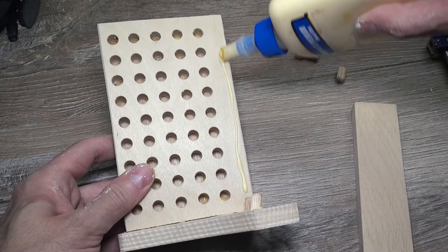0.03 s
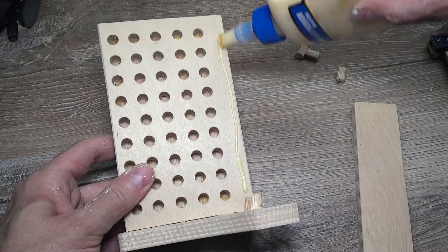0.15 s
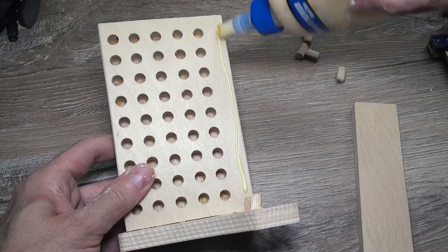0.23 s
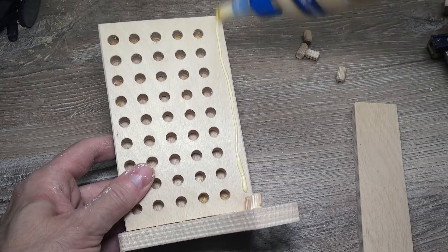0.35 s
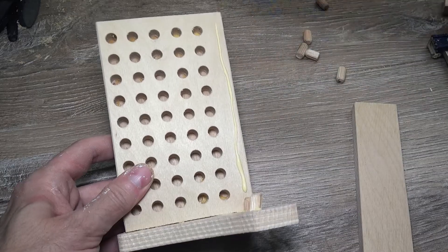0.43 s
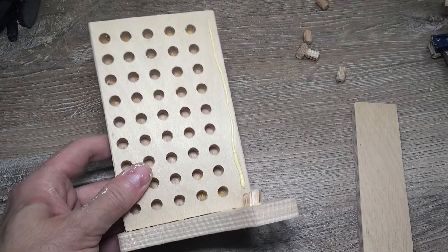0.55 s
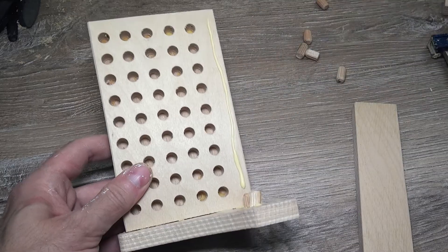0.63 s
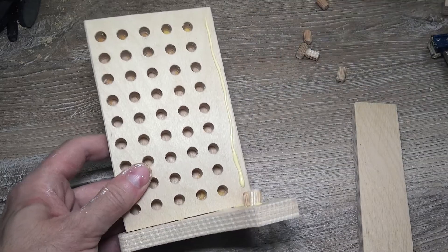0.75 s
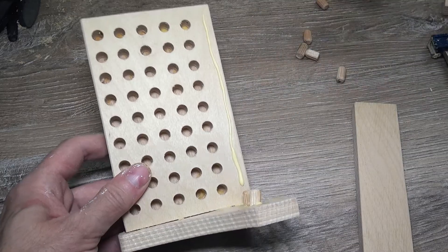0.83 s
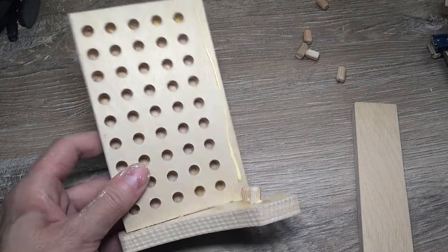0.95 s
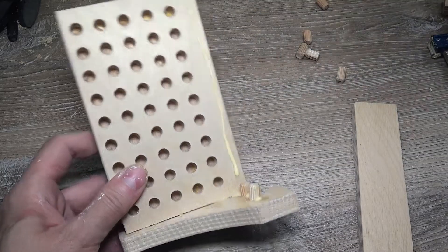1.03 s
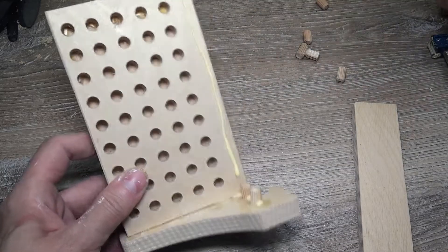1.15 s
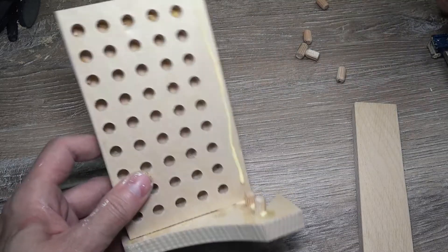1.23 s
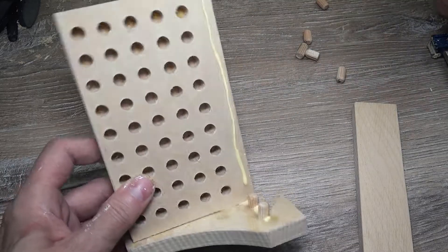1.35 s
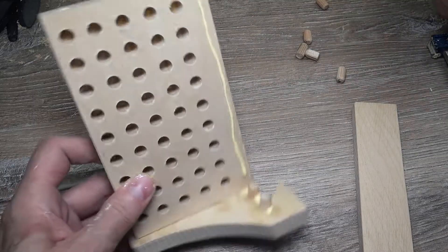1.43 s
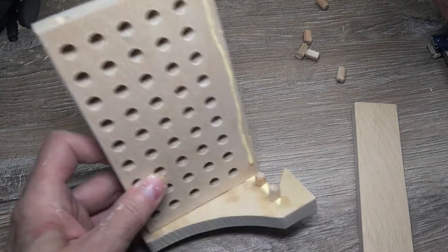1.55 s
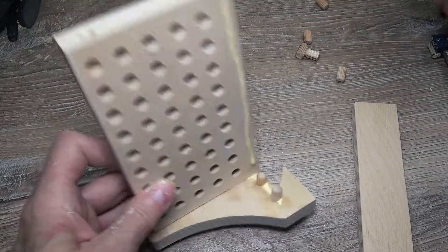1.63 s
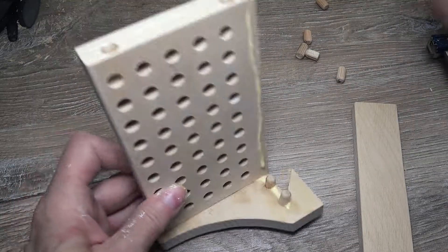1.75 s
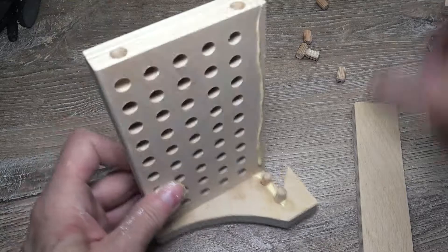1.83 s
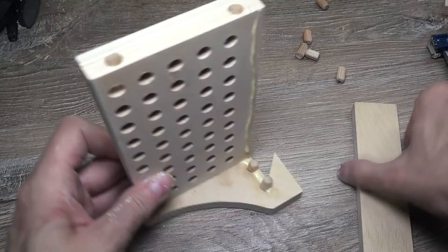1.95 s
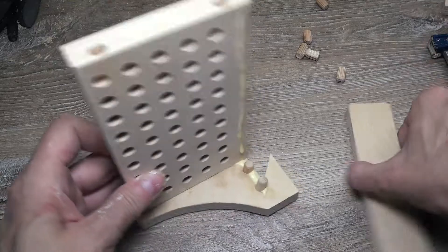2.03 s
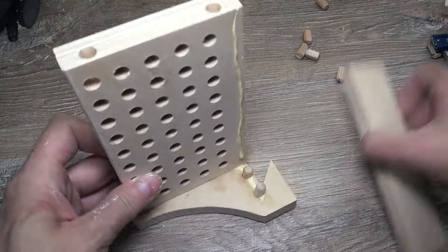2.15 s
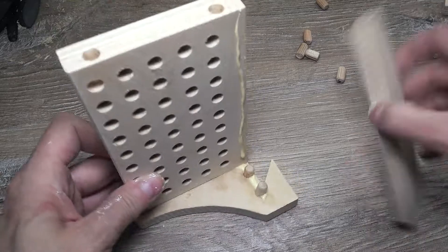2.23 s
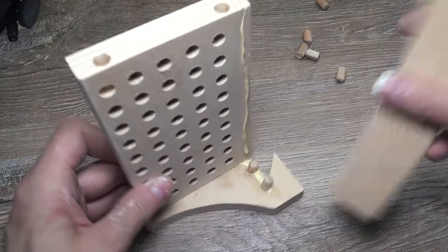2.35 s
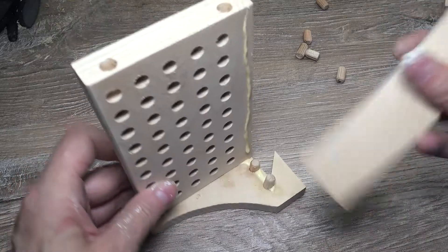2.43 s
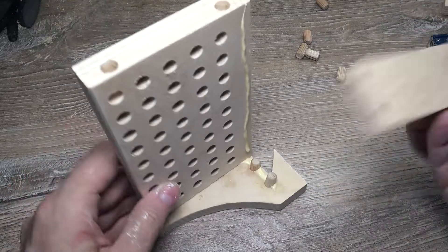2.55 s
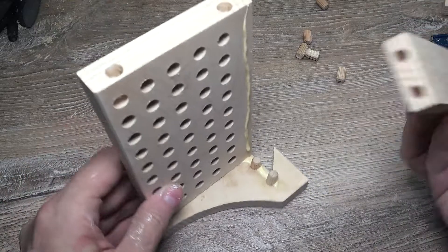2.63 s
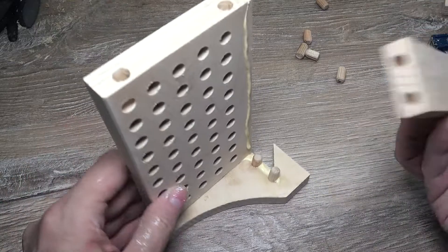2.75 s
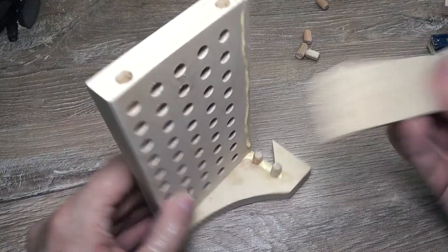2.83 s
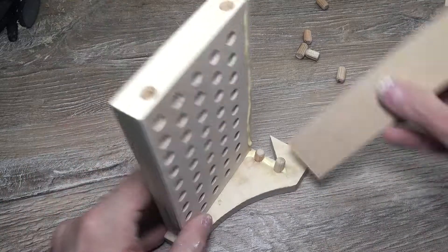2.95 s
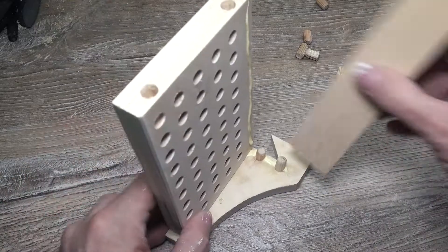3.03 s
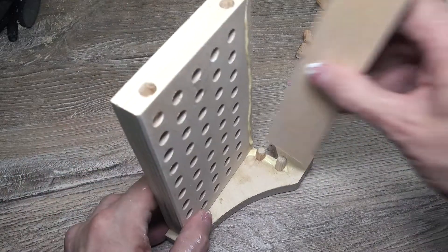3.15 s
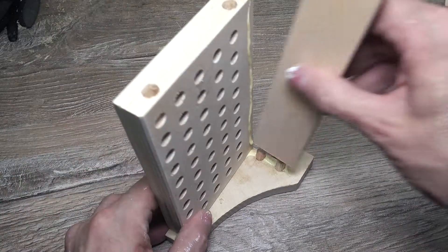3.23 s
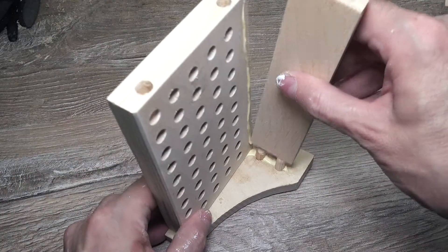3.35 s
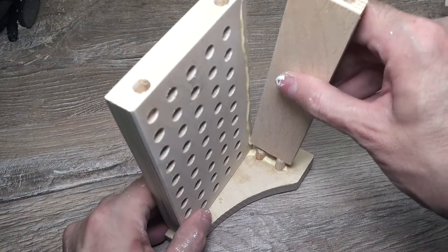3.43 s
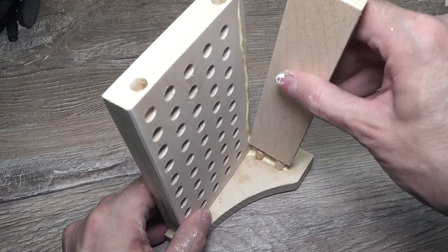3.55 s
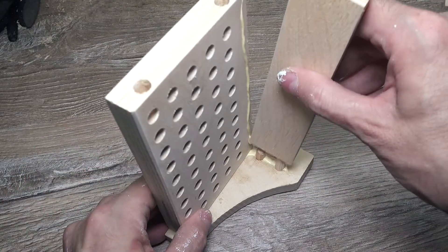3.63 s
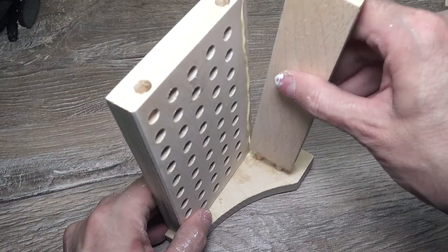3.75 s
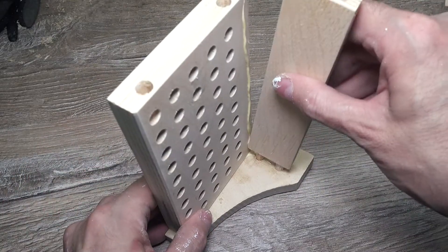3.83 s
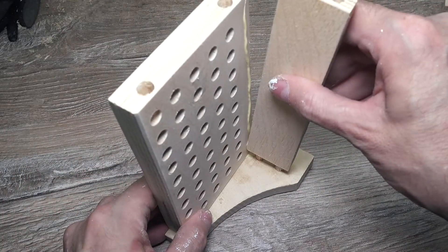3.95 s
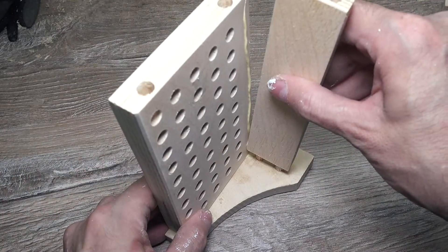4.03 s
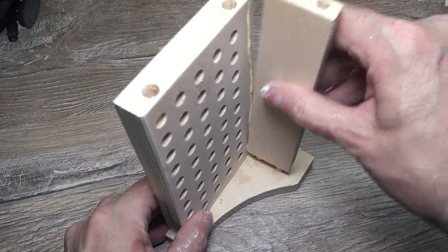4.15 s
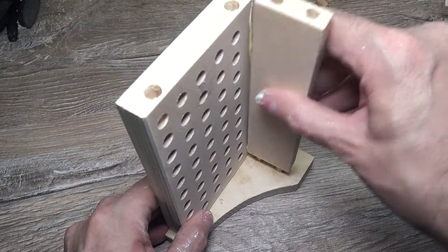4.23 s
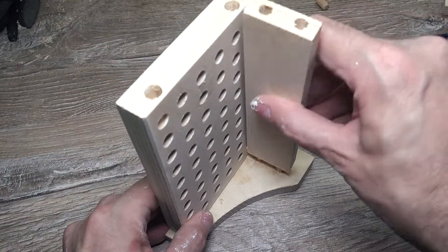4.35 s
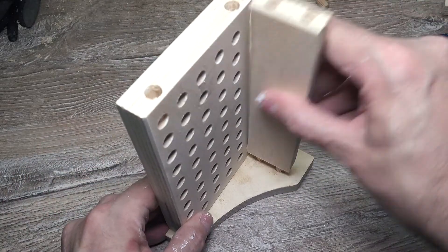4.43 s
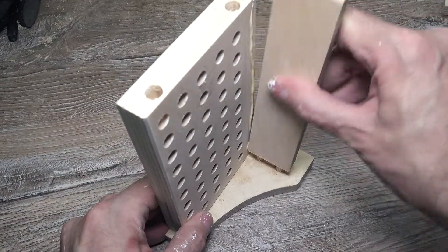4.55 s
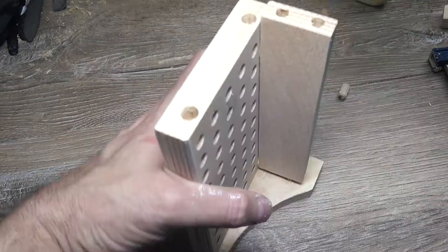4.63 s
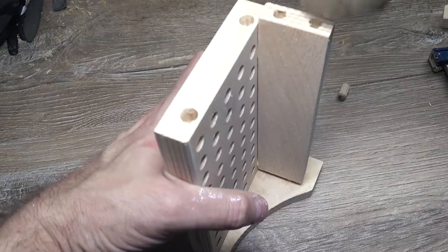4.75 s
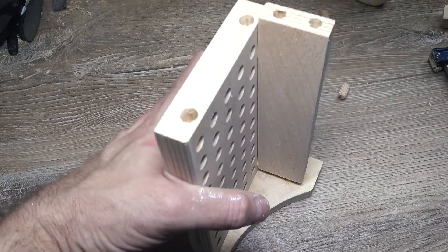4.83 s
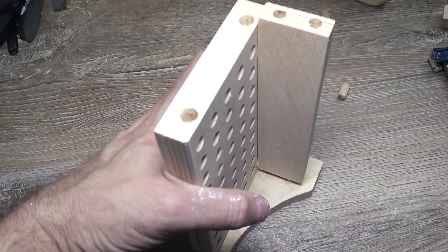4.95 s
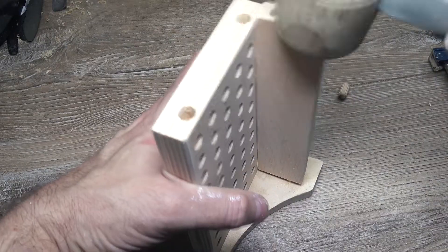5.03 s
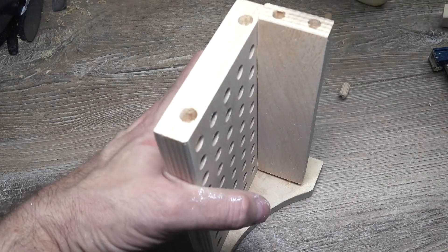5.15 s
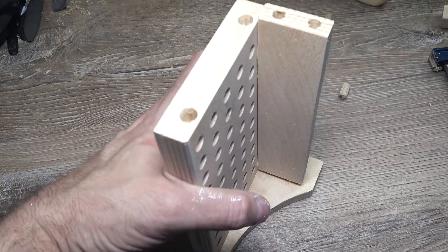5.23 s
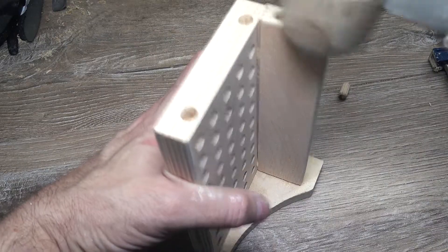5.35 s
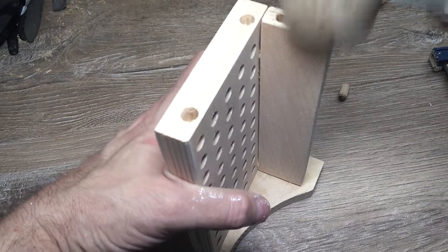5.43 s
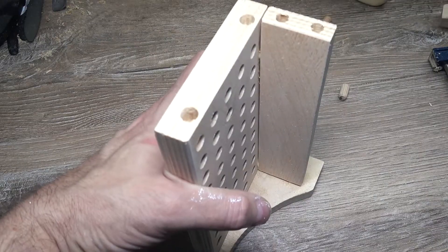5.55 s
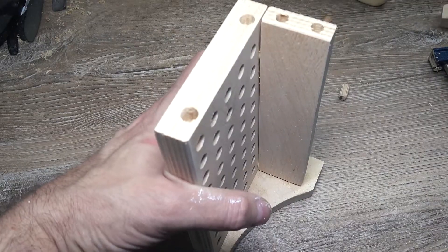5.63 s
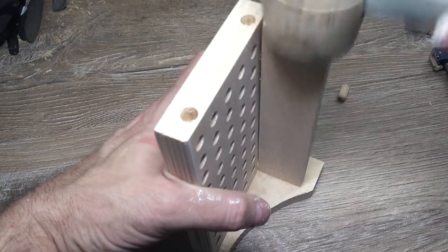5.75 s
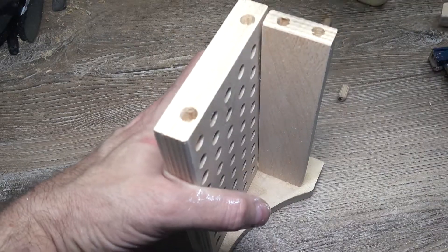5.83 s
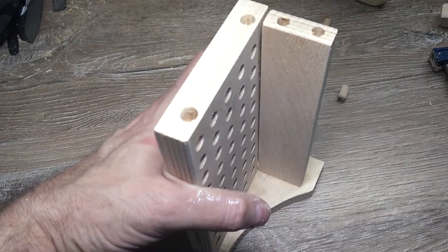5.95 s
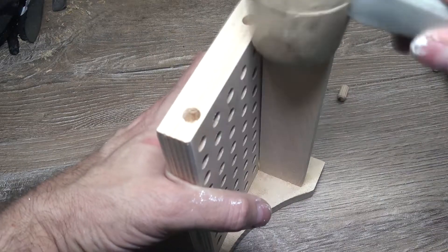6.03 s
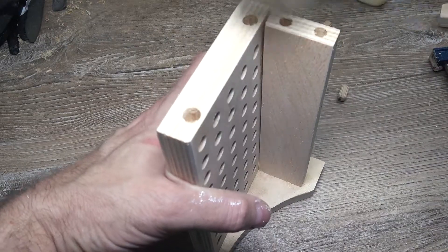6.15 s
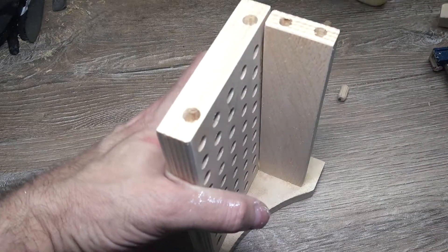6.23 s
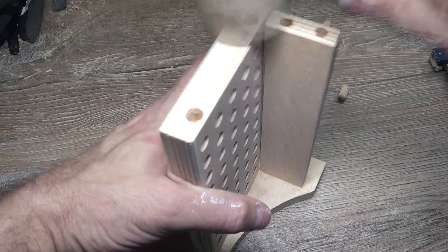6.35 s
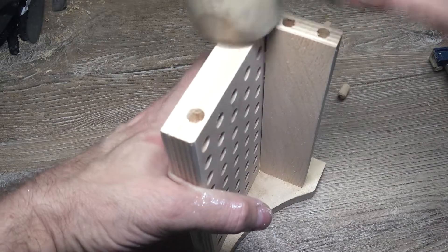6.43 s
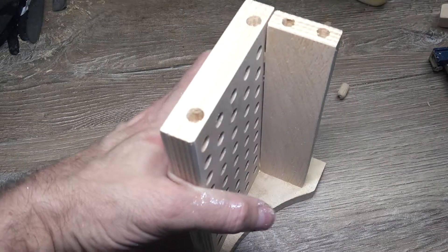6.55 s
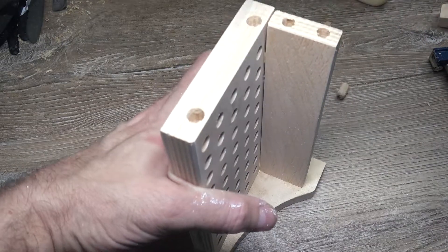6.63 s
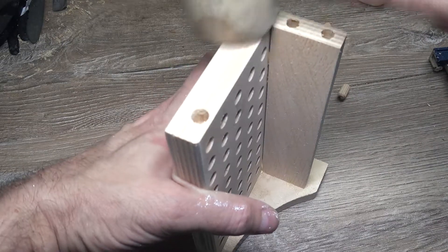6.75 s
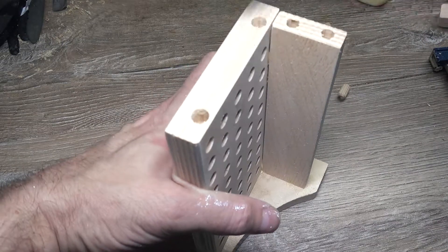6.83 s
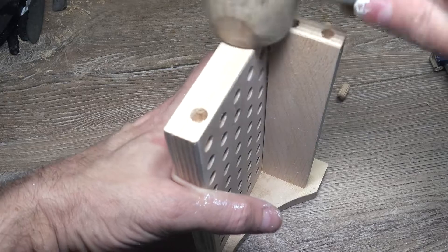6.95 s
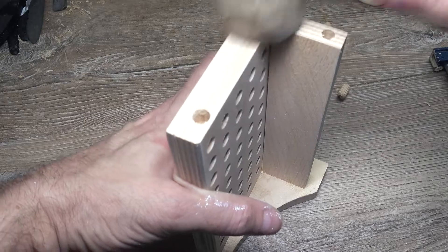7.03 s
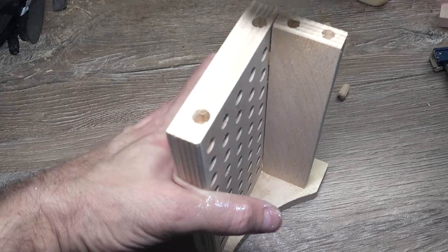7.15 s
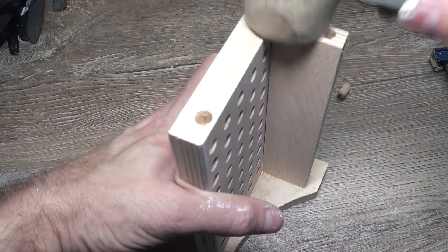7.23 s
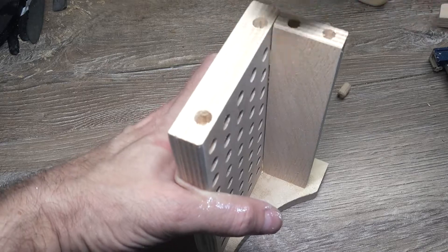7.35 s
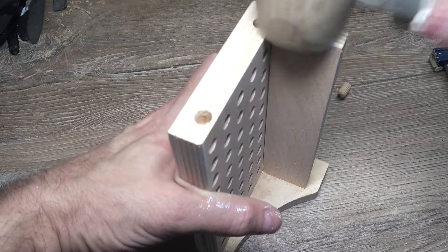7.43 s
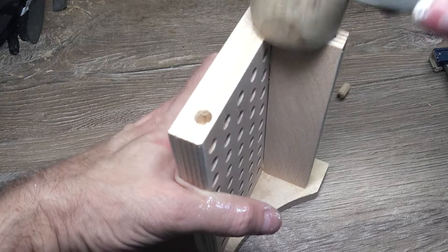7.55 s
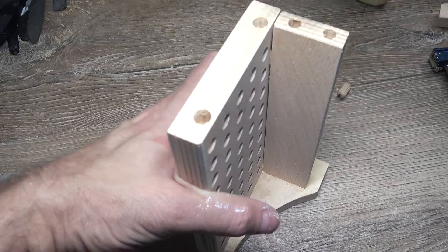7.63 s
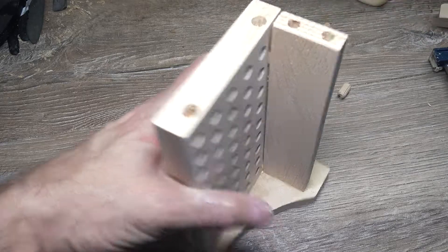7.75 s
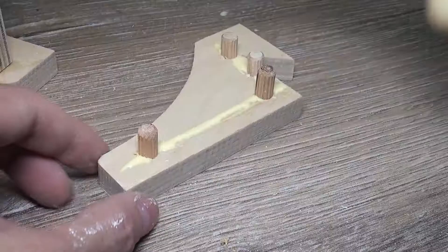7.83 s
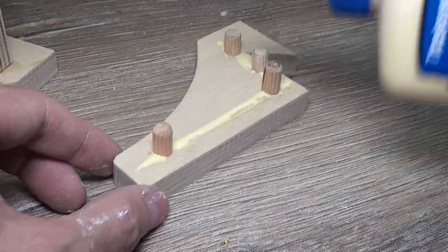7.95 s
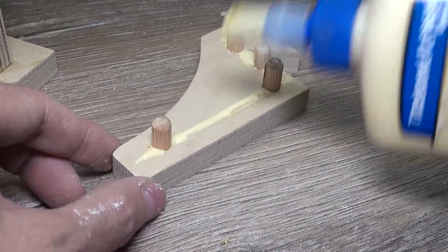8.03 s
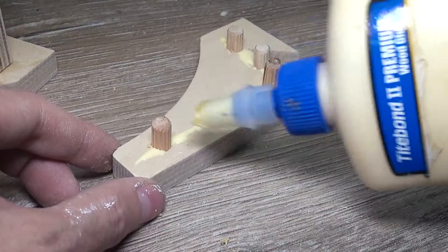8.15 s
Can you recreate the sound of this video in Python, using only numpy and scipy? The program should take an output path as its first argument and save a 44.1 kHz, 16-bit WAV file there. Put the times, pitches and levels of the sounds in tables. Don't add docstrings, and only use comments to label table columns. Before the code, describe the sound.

Low shop air and faint hum, with fingers brushing dry wood. A wooden part bumps down twice, a strip slides and stutters off the bench, and small taps seat it. Then a mallet strikes nine times, sharp snap over low hollow ring, first on a loose strip and then a drilled block. Each blow is squashed by the recorder's limiter. It ends abruptly on soft handling.

```python
import sys
import numpy as np
from scipy import signal
from scipy.io import wavfile
from scipy.ndimage import uniform_filter1d

SR = 44100
rng = np.random.default_rng(int(sys.argv[2]) if len(sys.argv) > 2 else 0)


def persist_wave(psi):
    counts = np.round(np.clip(psi, -1, 1) * 32767).astype(np.int16)
    wavfile.write(sys.argv[1], SR, np.atleast_2d(counts).T)


def natural_amplitude(level_db):
    exponent = np.asarray(level_db, float) / 20
    return 10 ** exponent


N = 361176

CUTS_S = [0, 4.677, 7.833, 8.19]

# (time [s], ring [dB], bench [dB], air [dB], limiter duck [dB])
BLOWS = [
    (5.053, -10.5, -20, -26, 14.5),
    (5.394, -7.5, -15.5, -25.5, 9),
    (5.7204, -7, -14.5, -26.5, 9),
    (6.031, -5, -15.5, -29, 7.5),
    (6.397, -8, -16, -31.5, 7.5),
    (6.711, -10, -15.5, -30, 5.5),
    (6.976, -8.5, -15.5, -35, 4.5),
    (7.227, -9.5, -18.5, -37.5, 5.5),
    (7.4742, -9, -14, -36.5, 1.5),
]
# (time before cut [s], ring [dB], bench [dB], air [dB], bench pitch [Hz])
EARLIER = [
    (0.27, -27, -23, -63, 260),
    (0.21, -43, -13.5, -48.5, 40),
]
# (time [s], ring [dB], bench [dB], air [dB])
KNOCKS = [(1.156, -25.5, -23, -32), (1.34, -40, -41, -78), (1.678, -20.5, -20.5, -38.5),
          (1.953, -43, -26.5, -34), (2.1, -28.5, -25.5, -28), (2.222, -21.5, -38.5, -50),
          (2.364, -49, -48, -41), (3.444, -42, -37.5, -100), (3.846, -60, -38.5, -75),
          (4.443, -52.5, -41.5, -49), (4.5, -41.5, -45, -46), (4.558, -29, -43.5, -106),
          (4.666, -42, -41, -73), (6.356, -72, -32, -88), (6.453, -52.5, -27.5, -28),
          (7.689, -42.5, -40.5, -54.5)]
# (time [s], ring [dB], bench [dB], air [dB])
EDGE_KNOCKS = [
    (0.418, -58, -50.5, -72),
    (2.861, -47, -41, -44.5),
    (6.441, -48, -36, -69),
    (7.263, -67, -50, -48),
]
MALLET_SPOT_HZ, BENCH_MIDDLE_HZ, BENCH_EDGE_HZ = 181.4, 98.2, 380


def knocks(bands):
    blows, small = np.zeros((2, N)), np.zeros((2, N))
    for s, ring_db, bench_db, air_db, duck_db in BLOWS:
        levels_db = ring_db + duck_db, bench_db + duck_db, air_db + duck_db
        add_knock(blows, bands, round(s * SR), 0, *levels_db, MALLET_SPOT_HZ, hard=True)
    for cut_s, (age_s, *touch) in zip(CUTS_S, EARLIER):
        add_knock(small, bands, round(cut_s * SR), age_s, *touch, hard=True)
    for rows, pitch_hz in (KNOCKS, BENCH_MIDDLE_HZ), (EDGE_KNOCKS, BENCH_EDGE_HZ):
        for s, *touch in rows:
            add_knock(small, bands, round(s * SR), 0, *touch, pitch_hz, hard=False)
    return blows * limiter() + small + cracks()


RECOVERY_DB_PER_S, OVERSHOOT, OVERSHOOT_S = 102.5, 0.48, 0.054


def limiter():
    t = np.arange(N) / SR
    duck_db = np.zeros(N)
    for s, *_, depth_db in BLOWS:
        since = np.maximum(t - s, 0)
        steady_db = np.maximum(depth_db - RECOVERY_DB_PER_S * since, 0)
        overshoot_db = OVERSHOOT * depth_db * np.exp(-since / OVERSHOOT_S)
        duck_db = np.where(t >= s, steady_db + overshoot_db, duck_db)
    return natural_amplitude(-duck_db)


def add_knock(out, bands, start, age_s, ring_db, bench_db, air_db, pitch_hz, hard):
    later_cuts = [round(c * SR) for c in CUTS_S if c * SR > start + 1]
    end = min(later_cuts + [N, start + round((.9 if hard else .6) * SR)])
    t = age_s + np.arange(end - start) / SR
    on_strip = hard and CUTS_S[1] < start / SR < STRIP_BLOWS_END_S
    out[:, start:end] += bench_ring(t, ring_db, bench_db, pitch_hz, hard, on_strip)
    add_shop_tail(out, bands, start, t, ring_db, bench_db, air_db, hard)


# (frequency [Hz], level [dB], T60 [s], left lead [rad], boost when strip is struck [dB])
BENCH = [(95, -10.5, 0.26, 0.27, 12), (108.18, 0.5, 0.79, 0.17, 3), (118, -10.5, 1.2, 0.3, 3),
         (154.2, -11.5, 1.3, 0.31, 0.5), (171.6, -20.5, 0.97, 0.32, 12.5), (210.8, -21, 1.02, 0.56, 5.5),
         (243.8, -10.5, 0.62, 0.52, 8.5), (266.6, -3, 0.81, 0.34, -1), (319, -19.5, 1.1, 0.61, -6),
         (368, -23.5, 0.66, 0.42, 8.5), (429, -13.5, 0.32, 0.34, -12), (488.3, -21, 0.58, 0.2, -2.5),
         (555, -21.5, 0.34, 0.5, -7), (707, -18.5, 0.27, 0.44, -4), (926, -11, 0.07, 0.27, -11.5)]
# (frequency [Hz], level [dB], T60 [s], left lead [rad], boost when strip is struck [dB])
WORK = [(1030, -41.5, 0.26, 3.9, 2), (1113, -31, 0.5, 0.75, -8.5), (1315, -31.5, 0.37, 1.0, -2.5),
        (1520, -39, 0.57, 0.77, 1.5), (1760, -41.5, 0.3, 0.54, 8.5), (2080, -45, 0.3, 1.2, -6.5),
        (2370, -47, 0.16, 1, -7), (4400, -52.5, 0.37, 0.9, 2.5), (4780, -45.5, 0.27, 0.53, 5.5)]
LANDING_S, LANDING_DB, LANDING_HZ = .118, -9, 200
STRIP_BLOWS_END_S = 6.2
BENCH_LEAN_DB = 0.6
SWING_UP_S = 0.0011


def bench_ring(t, ring_db, bench_db, pitch_hz, hard, on_strip):
    out = np.zeros((2, len(t)))
    landed = natural_amplitude(hard * LANDING_DB * np.clip((t - LANDING_S) / 0.011, 0, 1))
    rise = 1 - np.exp(-t / SWING_UP_S)
    lean = natural_amplitude([[BENCH_LEAN_DB / 2], [-BENCH_LEAN_DB / 2]])
    for hz, level_db, t60, lead, strip_db in BENCH + (WORK if hard else []):
        vary_db, vary_pitch, vary_phase = rng.standard_normal(3)
        lift_db = at_hz([(300, bench_db), (900, ring_db + 4.5)], hz)
        level = natural_amplitude(lift_db + level_db + on_strip * strip_db + vary_db) * near(hz, pitch_hz, 5.0 if hz < 400 else 0)
        phase = np.array([[lead], [0]]) + (hz > 1000) * 2 * vary_phase
        swing = np.sin(2 * np.pi * hz * (1 + 0.00734 * vary_pitch) * t + phase)
        mode = level * swing * natural_amplitude(-60 * t / t60)
        out += mode * rise * lean * (landed if hz < LANDING_HZ else 1)
    return out


# (frequency [Hz], level [dB per Hz])
SHOP = [(29, -48.5), (50, -20), (101, 0), (193, -11), (264, 3), (398, -8.5), (483, -14), (1300, -27.5),
        (3330, -47), (4450, -50.5), (5100, -44.5), (6240, -46), (12900, -46), (16000, -55)]
# (frequency [Hz], T60 [s])
SHOP_T60 = [(60, 0.95), (300, 0.6), (1100, 0.47), (3000, 0.38), (5000, .4), (6500, 0.25), (10000, .24),
            (15000, 0.24)]
SHOP_RISE_S = 0.00037


def add_shop_tail(out, bands, start, t, ring_db, bench_db, air_db, hard):
    lift = [(250, bench_db - 10.5), (1000, ring_db - 0.5), (6000, air_db + 27.0), (14000, 1.66 * air_db + 21.0)]
    for hz, band in bands:
        t60 = at_hz(SHOP_T60, hz) * (1 if hard else at_hz([(300, 0.99), (3000, 0.26)], hz))
        heard = t[:round(1.2 * t60 * SR)]
        decay = natural_amplitude(-60 * heard / t60) - hard * np.exp(-heard / SHOP_RISE_S)
        span = slice(start, start + len(heard))
        out[:, span] += natural_amplitude(at_hz(lift, hz) + at_hz(SHOP, hz) + 19.5) * decay * band[:, span]


TICK_SHARED = .4


def cracks():
    out, t = np.zeros((2, N)), np.arange(6000) / SR
    rows = contacts()
    ticks = signal.lfilter([.42], [1, -.68], rng.standard_normal((len(rows), 2, 6000)))
    for (s, db, hz, t60, tick_db), tick in zip(rows, ticks):
        body = sum(level * np.sin(2 * np.pi * ratio * hz * t) for ratio, level in [(1, 1), (1.7, .25), (.67, .3)])
        swell = np.minimum(t * hz / 0.57, 1) ** 2
        noise = natural_amplitude(tick_db - 60 * t / (1.01 * t60)) * (tick + TICK_SHARED * tick[0])
        snap = body * swell * natural_amplitude(-60 * t / t60) + noise
        part = out[:, round(s * SR):][:, :6000]
        part += natural_amplitude(db + 5.5) * snap[:, :part.shape[1]]
    return out * natural_amplitude([[-1.5], [1.5]])


# (peak [dB], pitch [Hz], tick over peak [dB], ring [cycles])
SMACKS = [
    (-6, 2300, -18, 2.8),
    (2, 2500, -11, 2.6),
    (-6.5, 1200, -5.5, 7.1),
    (-18, 1400, -3.5, 15),
    (-8, 1240, -18, 9.7),
    (-8.5, 1510, -15.5, 7.6),
    (2, 1060, -29.5, 3.4),
    (-5.5, 1300, -19.5, 8),
    (-6.5, 1100, -22.5, 5.5),
]
# (time [s], peak [dB], tick over peak [dB])
TAPS = [(1.158, -48, -19), (1.342, -46, -5), (1.678, -25.5, -19), (2.224, -56, 14), (3.445, -52.5, 0.5),
        (3.846, -50.5, -12), (4.255, -59, 2.5), (4.443, -49, -15), (4.476, -37.5, -11), (4.502, -39, -23),
        (4.56, -41, -22), (4.668, -63, -13), (7.691, -55.5, -18), (8.094, -45, -21)]
# (time [s], peak [dB], pitch [Hz], tick over peak [dB])
CLICKS = [(.001, -54, 885, 6), (1.443, -66, 2360, 4), (1.4697, -53, 4640, 5), (1.5276, -43, 4780, -14),
          (1.9267, -44, 1770, -1), (2.0406, -50, 1890, -1), (2.3943, -39, 2120, -2), (3.096, -49, 4400, -1),
          (3.139, -42, 6830, -22), (7.014, -37, 4400, -14), (7.919, -42, 1020, -5), (8.049, -51, 985, 4),
          (4.731, -76, 9000, 6), (0.419, -58.5, 1150, 3), (0.698, -55, 1030, -8), (0.761, -56, 1760, 0),
          (1.326, -65, 1840, 22), (1.954, -36.5, 1830, -3), (2.101, -36, 4600, -16), (2.317, -76, 2130, -3),
          (2.3625, -40.5, 2090, -14), (2.8634, -46, 2280, -4), (3.922, -51, 1950, -3),
          (4.757, -63.5, 1160, 0.5), (7.263, -38, 994, 2), (7.8322, -59, 4470, 8)]
# (time [s], peak [dB], pitch [Hz], tick over peak [dB])
HOPS = [(5.148, -49, 8500, 10), (5.186, -38.5, 3030, 2), (5.439, -51, 9000, 14.5), (5.4486, -30.5, 4400, 5),
        (5.518, -45.5, 8600, 10.5), (5.769, -48, 4300, -2), (5.785, -41.5, 9800, 13), (5.848, -40, 4300, 3),
        (5.955, -49, 4310, -4), (6.076, -44, 5200, -3), (6.085, -35, 4320, 0), (6.4412, -44, 3030, 13),
        (6.982, -34, 4600, -9), (7.021, -50, 8700, 6), (7.041, -41, 3000, 3), (7.012, -36, 2600, -1),
        (7.2618, -38.5, 3530, 1), (5.8264, -40, 2610, 4), (7.767, -68, 2960, 3)]
# (time [s], peak [dB], pitch [Hz], ring T60 [s])
PINGS = [
    (6.094, -35, 4400, 0.036),
    (6.456, -27, 4400, 0.018),
    (6.486, -42, 4400, 0.065),
    (7.482, -32.5, 4730, 0.013),
    (7.491, -52, 12080, 0.24),
]
# (time [s], peak [dB], pitch [Hz], ring T60 [s])
THUDS = [
    (1.1572, -21.5, 159, 0.21),
    (1.6785, -13, 308, 0.03),
    (3.4468, -28, 342, 0.019),
    (4.504, -31.5, 157, 0.045),
    (4.5579, -31.5, 179, 0.037),
    (2.114, -22, 210, 0.016),
    (8.108, -41.5, 585, .02),
]
BLOCK_HZ, BLOCK_RING_S, CLICK_RING_S, HOP_RING_S = 864, 0.018, 0.021, 0.016
PING_TICK_DB, THUD_TICK_DB = -18, -26


def contacts():
    smacks = [(blow[0], db, hz, cycles / hz, tick_db) for blow, (db, hz, tick_db, cycles) in zip(BLOWS, SMACKS)]
    taps = [(s, db, BLOCK_HZ, BLOCK_RING_S, tick_db) for s, db, tick_db in TAPS]
    clicks = [(s, db, hz, CLICK_RING_S, tick_db) for s, db, hz, tick_db in CLICKS]
    hops = [(s, db, hz, HOP_RING_S, tick_db) for s, db, hz, tick_db in HOPS]
    pings = [(*row, PING_TICK_DB) for row in PINGS]
    thuds = [(*row, THUD_TICK_DB) for row in THUDS]
    return smacks + taps + clicks + hops + pings + thuds


# (peak time [s], rise [s], fall [s], hiss [dB], sizzle over hiss [dB])
BRUSHES = [(0.409, 0.15, 0.048, -83, 16), (.704, 0.023, 0.057, -68.5, 11), (.772, 0.032, 0.4, -72, 22),
           (.978, 0.4, 0.041, -65.5, 12.5), (1.544, 0.33, 0.083, -55, 7.5), (1.668, 0.14, 0.016, -66, 13),
           (1.7, .011, 0.54, -73, -3), (1.948, 0.2, 0.4, -56.5, -3), (2.108, 0.11, 0.13, -42, -1),
           (2.262, 0.21, 0.018, -55, -8), (2.3, 0.018, 0.91, -57, -16), (2.518, 0.33, 0.32, -69.5, 8),
           (2.863, 0.0074, 0.31, -46, 4), (2.924, 0.15, 0.34, -45, -11), (3.134, 0.22, 0.082, -63, 10.5),
           (3.87, .02, 0.032, -73.5, 20), (3.923, 0.04, 0.017, -64.5, 17.5),
           (4.446, 0.0045, 0.013, -64, 17), (4.507, 0.0054, .014, -55.5, 18.5),
           (4.479, 0.0056, 0.022, -60, 18), (4.557, 0.0054, 0.11, -57.5, 15),
           (4.674, 0.023, 0.0018, -59, 12.5), (7.847, 0.022, 0.091, -60.5, -0.5),
           (7.912, 0.1, 0.2, -57.5, 2.5), (8.039, 0.22, 0.14, -60.5, 2)]
# (peak time [s], rise [s], fall [s], level [dB])
SLIDES = [(.41, 0.074, 0.067, -56), (.772, .05, 0.9, -62), (1.2, 0.012, 0.23, -48), (1.544, 1, 0.44, -57.5),
          (1.7, 0.012, 0.5, -49), (1.956, 0.24, 0.25, -42.5), (2.108, 0.29, 0.39, -40),
          (2.262, 0.058, 0.04, -22.5), (2.284, 0.021, 0.65, -39.5), (2.55, 0.091, 0.99, -50.5),
          (2.924, 0.23, 0.3, -41.5), (3.03, 0.11, 0.66, -57), (4.557, 0.0048, 0.13, -46),
          (7.911, 0.011, 0.1, -47.5), (8.101, 0.54, 0.047, -52.5)]
# (peak time [s], rise [s], fall [s], level [dB])
SHUDDERS = [(1.2, 0.012, 1, -22.5), (1.7, 0.012, 0.84, -18.5), (1.95, 0.11, 0.1, -26),
            (2.108, 0.21, 0.11, -21.5), (2.262, 0.13, 0.19, -52), (3.016, 0.24, 1, -43.5),
            (3.54, 0.014, 0.099, -31), (3.844, 0.0077, 1, -41.5), (4.562, 0.011, 0.12, -30),
            (4.676, .1, .002, -45), (7.835, 0.0018, 0.14, -50), (8.101, 0.04, 0.1, -53.5)]
# (frequency [Hz], level [dB per Hz])
SIZZLE = [(3880, -26.5), (6600, -5), (7380, -9), (13000, -1), (15200, -18), (16000, -21)]
# (frequency [Hz], width [Hz], level [dB])
STRIP = [(644, 60, -26), (900, 150, -9.5), (1480, 80, -7), (1840, 42, -0.5), (2055, 14, 3), (2670, 110, -7),
         (4400, 32, -1.5), (6520, 240, -32.5)]
# (middle time [s], half length [s], pitch [Hz], level [dB])
PATCHES = [(7.93, 0.1, 4900, -64), (8.05, 0.05, 4100, -67), (7.92, 0.014, 3900, -55),
           (3.87, .01, 4500, -76), (4, 0.014, 4300, -73), (1.395, 0.027, 3200, -65),
           (.95, 0.046, 2380, -68), (1.7, 0.017, 3000, -64), (1.657, .025, 2960, -61),
           (1.97, 0.028, 3660, -56), (1.63, 0.021, 4960, -50), (1.976, 0.016, 1860, -47),
           (1.978, 0.034, 895, -46.5), (2.34, 0.012, 4800, -41), (2.8, 0.021, 2070, -54),
           (2.56, 0.088, 260, -58), (2.95, 0.049, 6700, -49), (2.89, 0.05, 4300, -49),
           (2.925, 0.059, 250, -38), (3.05, 0.039, 4650, -59), (3.88, 0.046, 1940, -64),
           (4.59, 0.013, 2240, -51.5)]
# (middle time [s], half length [s], pitch [Hz], level [dB])
WHISPERS = [(4.704, .03, 4400, -84), (0.074, 0.044, 3720, -83), (0.117, .07, 2900, -82),
            (0.32, 0.11, 2880, -78), (.4, .025, 4720, -82), (0.524, 0.086, 2290, -72),
            (.57, 0.071, 1880, -70), (0.652, 0.042, 2300, -80), (1.575, 0.0095, 3420, -49),
            (1.928, 0.082, 3980, -66), (1.988, 0.033, 3220, -58), (2.07, 0.01, 2010, -52),
            (2.33, 0.075, 2080, -57), (2.898, .025, 1730, -51), (2.978, 0.023, 1880, -55),
            (2.92, .04, 3180, -68)]
PATCH_WIDTH, WHISPER_WIDTH = 0.089, 0.04


def rubbing():
    hiss, wood, rumble = strokes([row[:-1] for row in BRUSHES]), strokes(SLIDES), strokes(SHUDDERS)
    sizzle = strokes([(*when, db + over_db) for *when, db, over_db in BRUSHES])
    bands = list(noise_bands(4.25, 3.2))
    grit = shaped(bands, [(300, 2.5), (700, -8.0), (2500, -18.5), (8000, -24.0)])
    skin = shaped(bands, [(1800, -25.0), (2600, -8.5), (4500, 3.0), (6000, 9.5), (7500, -32.0)])
    strip = .5 * grit + sum(natural_amplitude(db + 6.5) * resonate(grit, hz, 2.65 * width) for hz, width, db in STRIP)
    shake = 0
    for hz, db, *_ in BENCH[:9]:
        mode = rms_one(resonate(grit[0] + grit[1], hz, 4.6))
        shake = shake + near(hz, 141.0, 32.0) * natural_amplitude(0.39 * db) * mode
    out = hiss * natural_amplitude(2.5) * skin + sizzle * shaped(bands, SIZZLE)
    out = out + wood * natural_amplitude(-2.5) * rms_one(strip) + rumble * natural_amplitude(-3.0) * shake
    return out + patches(grit, PATCHES, PATCH_WIDTH) + patches(grit, WHISPERS, WHISPER_WIDTH)


STROKE_CURVE = 3.1


def strokes(rows):
    t = np.arange(0, N, 20) / SR
    power = 0
    for s, rise, fall, db in rows:
        ramp = np.interp(t, [s - rise, s, s + fall], [0, 1, 0])
        power = power + (natural_amplitude(db) * ramp ** STROKE_CURVE) ** 2
    return np.interp(np.arange(N) / SR, t, np.sqrt(power))


def patches(grit, rows, share):
    out, t = np.zeros((2, N)), np.arange(N) / SR
    for s, half, hz, db in rows:
        span = slice(max(round((s - 3 * half) * SR), 0), round((s + 3 * half) * SR))
        tone = rms_one(resonate(resonate(grit[:, span], hz, share * hz), hz, 4.5 * share * hz))
        out[:, span] += natural_amplitude(db) * tone * np.exp(-((t[span] - s) / half) ** 2)
    return out


# (time [s], peak [dB])
SLIPS = [
    (2.2308, -27.5),
    (2.2338, -22),
    (2.2464, -20.5),
    (2.2543, -10.5),
    (2.2548, -31.5),
    (2.2634, -15.5),
    (2.2674, -39.5),
]


def judder():
    jolts = np.full(N, 1e-18)
    for s, db in SLIPS:
        jolts[round(s * SR)] = natural_amplitude(db + 24.0)
    out = np.zeros(N)
    for hz, width, db in STRIP:
        out += natural_amplitude(db + rng.normal(0, 1)) * resonate(jolts, hz, 2.2 * width) * 40 / width
    return out


# (time [s], pitch [Hz], level [dB])
SQUEAKS = [
    [(2.44, 2240, -75), (2.47, 2255, -60), (2.5, 2280, -59), (2.55, 2310, -65), (2.58, 2230, -68),
     (2.61, 2290, -58), (2.64, 2340, -82)],
    [(2.67, 2254, -80), (2.7, 2270, -52), (2.715, 2370, -58), (2.76, 2303, -61), (2.8, 2264, -50),
     (2.83, 2205, -61), (2.87, 2260, -47), (2.895, 2190, -56), (2.92, 2200, -78)],
    [(2.69, 2240, -78), (2.72, 2110, -70), (2.75, 2206, -53), (2.79, 2160, -59), (2.81, 2090, -74)],
]


def squeak():
    flutter = rms_one(signal.lfilter([1], [1, -.997], rng.standard_normal(N)))
    out = np.zeros(N)
    for rows in SQUEAKS:
        hz, level_db = in_time(rows, -120)
        out += natural_amplitude(level_db) * (1 + .3 * flutter) * np.sin(2 * np.pi * np.cumsum(hz) / SR)
    return out


# (air at start [dB], at end [dB], rumble below 200 Hz at start [dB], at end [dB])
SHOT_AIR = [
    (-52.5, -53.5, -57.5, -55.5),
    (-72, -95, -53, -71),
    (-42, -48.5, -41, -58),
]
# (frequency [Hz], level [dB per Hz])
FLOOR = [(12, -32), (20, 18), (38, -2), (60, -6), (127, -8), (182, -13.5), (399, -16), (472, -20.5),
         (574, -17.5), (1610, -28), (1910, -28), (2820, -50), (14300, -33.5), (16000, -37)]
# (frequency [Hz], level [dB])
HUM = [(48, -66.5), (129, -64), (264, -87), (576, -79.5)]


def floor(bands):
    ends = []
    for k, (air_start, air_end, rumble_start, rumble_end) in enumerate(SHOT_AIR):
        ends.append((CUTS_S[k], air_start, rumble_start))
        ends.append((CUTS_S[k + 1] - 1 / SR, air_end, rumble_end))
    air, rumble = natural_amplitude(in_time(ends, -60))
    hum = sum(natural_amplitude(db + 55.5) * rms_one(resonate(rng.standard_normal(N), hz, 2.1)) for hz, db in HUM)
    noise = shaped(bands, FLOOR) + hum
    low = signal.sosfilt(signal.butter(3, 200, fs=SR, output="sos"), noise)
    high = signal.sosfilt(signal.butter(3, 200, "high", fs=SR, output="sos"), noise)
    return air * high + rumble * low


# (frequency [Hz], left-right correlation)
LIKENESS = [(60, 1), (250, 0.86), (700, 0.39), (2000, 0.45), (4500, 0.4), (8000, 0.1), (12000, 0.03)]
# (frequency [Hz], left minus right [dB])
LEAN = [(60, 0.5), (180, 1.5), (550, 1), (1650, -4.5), (4970, -2.5), (15000, 1.5)]
# (frequency [Hz], share of left-right difference)
WALL = [(300, 0.36), (1500, 0.09), (5000, 0.059), (9000, 0.32)]
WALL_LAG_SAMPLES = 41
EDGES_HZ = 22 * 2 ** np.arange(0, 9.7, .4)
CENTRES_HZ = np.sqrt(EDGES_HZ[1:] * EDGES_HZ[:-1])


def noise_bands(spike_db, patchy_db):
    white = rng.standard_normal((2, 2, N))
    white = rms_one(white * natural_amplitude(spike_db * np.minimum(rng.exponential(size=N), 5)))
    knots = np.arange(0, N, 900)
    for k, hz in enumerate(CENTRES_HZ):
        band_pass = signal.butter(2, EDGES_HZ[k:k + 2], "band", fs=SR, output="sos")
        mid, side = signal.sosfilt(band_pass, white[k % 2])
        alike, wall = np.clip([at_hz(LIKENESS, hz), at_hz(WALL, hz)], -.9, .99)
        side = wall * np.roll(mid, WALL_LAG_SAMPLES) + np.sqrt(1 - wall ** 2) * side
        both = np.sqrt(1 + alike) * mid + np.sqrt(1 - alike) * side * np.array([[1], [-1]])
        flicker = np.interp(np.arange(N), knots, natural_amplitude(patchy_db * rng.standard_normal(len(knots))))
        yield hz, both * flicker * natural_amplitude(at_hz(LEAN, hz) * np.array([[.5], [-.5]]))


def shaped(bands, spectrum):
    return rms_one(sum(natural_amplitude(at_hz(spectrum, hz)) * band for hz, band in bands))


def resonate(x, hz, width_hz):
    r = np.exp(-np.pi * width_hz / SR)
    zeros = np.array([1, 0, -1]) * (1 - r * r) / 2
    return signal.lfilter(zeros, [1, -2 * r * np.cos(2 * np.pi * hz / SR), r * r], x)


def near(hz, centre_hz, db_per_octave):
    return natural_amplitude(-db_per_octave * np.abs(np.log2(hz / np.maximum(centre_hz, 50))))


def at_hz(points, hz):
    table_hz, values = np.array(points).T
    return np.interp(np.log(hz), np.log(table_hz), values)


def in_time(rows, outside_db):
    s, *columns = np.transpose(rows)
    return np.array([np.interp(np.arange(N) / SR, s, c, outside_db, outside_db) for c in columns])


def rms_one(x):
    return x / np.sqrt(np.mean(x ** 2) + 1e-20)


# (frequency [Hz], level [dB per bin])
TREBLE_KEPT = [(11900, -140), (12100, -107), (13000, -100), (14000, -93), (15000, -86), (16000, -78),
               (17000, -72)]
HOLE_SHARE, HOLE_FROM_DB, HOLE_TO_DB = .3, -82, -103
HISS_DB = -87.5


def starve(x):
    in_mallet_shot = np.digitize(np.arange(N) / SR, CUTS_S) == 2
    x = x + natural_amplitude(HISS_DB) * rng.standard_normal(x.shape) * in_mallet_shot
    hz, s, bins = signal.stft(x, SR, nperseg=1024)
    bins = bins[:, :512]
    power = np.mean(np.abs(bins.reshape(2, 64, 8, -1)) ** 2, axis=(0, 2))
    level_db = 10 * np.log10(uniform_filter1d(power, size=3, axis=1) + 1e-20)
    centres = hz[4:512:8].reshape(-1, 1)
    treble_db = np.median(level_db[18:34], axis=0)
    luck = np.repeat(rng.random((64, len(s) // 4 + 1)), 4, axis=1)[:, :len(s)]
    fading = (treble_db < HOLE_FROM_DB) & (treble_db > HOLE_TO_DB)
    holes = (luck < HOLE_SHARE) & (centres > 6000) & fading
    closed = np.cumsum(level_db < at_hz(TREBLE_KEPT, centres), axis=0) > 0
    mallet_gain = (1 - closed) * (1 - .92 * holes)
    other_gain = (centres < 15800) | (level_db > -90)
    gain = np.where((s > CUTS_S[1]) & (s < CUTS_S[2]), mallet_gain, other_gain)
    return signal.istft(bins * np.repeat(gain, 8, axis=0), SR, nperseg=1024, nfft=1024)[1][:, :N]


def scene():
    air = list(noise_bands(0, 1.96))
    return knocks(air) + rubbing() + judder() * natural_amplitude([[-2], [2]]) + squeak() + floor(air)


def roll_off(x):
    return signal.sosfilt(signal.butter(12, 16790, fs=SR, output="sos"), x)


# (frequency [Hz], width [Hz])
NOTCHES = [
    (5450, 60),
    (6400, 400),
    (7250, 160),
]
SEAM_HZ, TREBLE_DB, PORT_LAG_SAMPLES = 5400, -5, 2


def record(dry):
    low = signal.sosfilt(signal.butter(6, SEAM_HZ, "low", fs=SR, output="sos"), dry)
    high = signal.sosfilt(signal.butter(6, SEAM_HZ, "high", fs=SR, output="sos"), dry)
    mix = np.array([low[0], np.roll(low[1], PORT_LAG_SAMPLES)]) + natural_amplitude(TREBLE_DB) * high
    for hz, width in NOTCHES * 2:
        mix = mix - resonate(mix, hz, width)
    mix = signal.sosfilt(signal.butter(2, 45, "high", fs=SR, output="sos"), mix)
    mix = signal.sosfilt(signal.cheby2(10, 60, 17100, fs=SR, output="sos"), starve(mix))
    mix = 0.74 * np.tanh(mix / 0.85)
    return roll_off(mix)


dry = scene()
out = record(dry)
persist_wave(out)
```